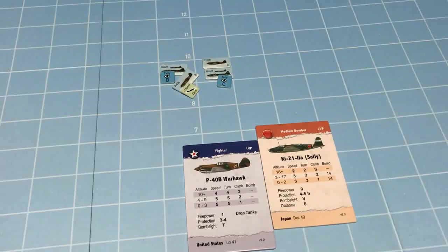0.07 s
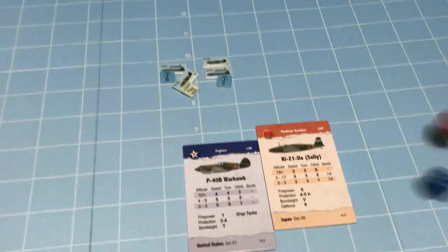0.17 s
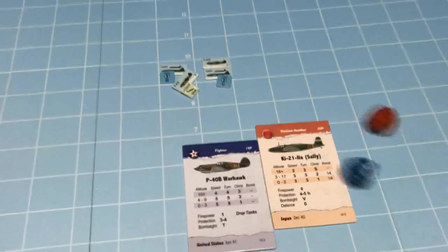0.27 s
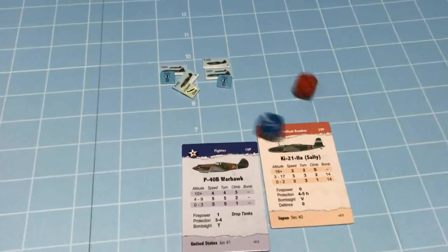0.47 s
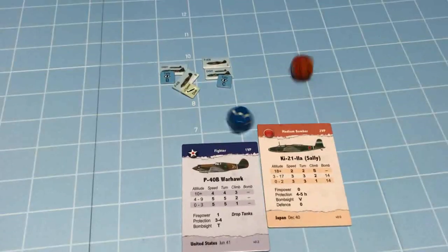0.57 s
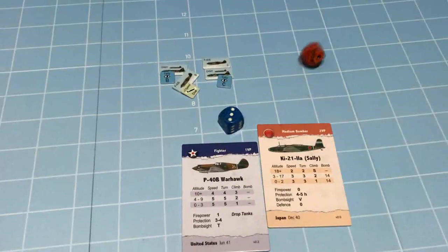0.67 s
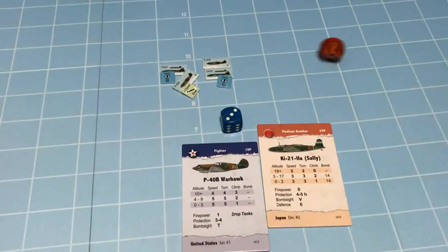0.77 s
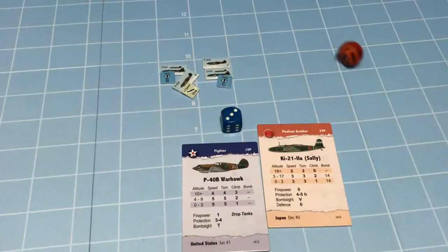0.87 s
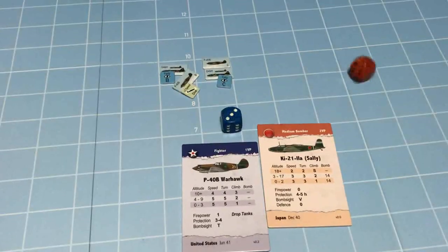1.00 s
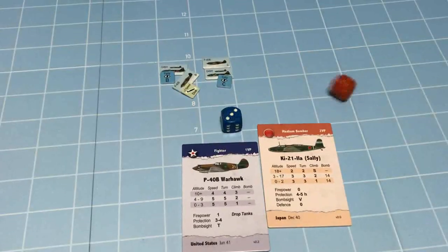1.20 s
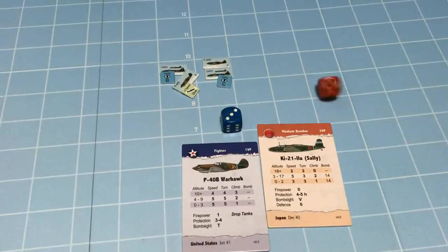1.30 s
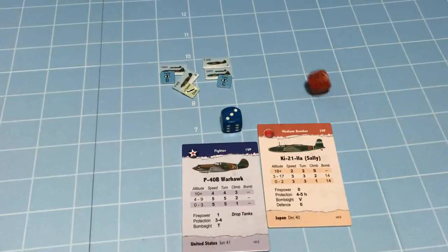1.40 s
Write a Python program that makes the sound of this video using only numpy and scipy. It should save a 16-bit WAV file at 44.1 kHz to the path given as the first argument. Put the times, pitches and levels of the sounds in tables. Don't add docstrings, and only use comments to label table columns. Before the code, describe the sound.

Dice thrown on a padded table: bright hand clicks, a tight burst of loud dull knocks, a softer rolling patter, then sparse faint taps as they settle, closely miked in a small room with low hum.

```python
import sys
import numpy as np
from scipy import signal
from scipy.fft import rfft, irfft
from scipy.io import wavfile
from scipy.ndimage import uniform_filter1d

SR = 44100
rng = np.random.default_rng(int(sys.argv[2]) if len(sys.argv) > 2 else 0)


def linear_from_db(decibels):
    return 10 ** (np.asarray(decibels, float) / 20)


def put_to_file(sound):
    columns = np.atleast_2d(sound).T
    safe = np.clip(columns, -1, 1)
    whole_steps = np.round(safe * 32767)
    wavfile.write(sys.argv[1], SR, whole_steps.astype(np.int16))


N = 63945

EARLIER_CLICK_DB, EARLIER_CLICK_HZ = -23.5, 5500
EARLIER_LOW_DB, EARLIER_HIGH_DB = -10.5, -7.5


def unit(x):
    return x / np.max(np.abs(x))


def add(out, at_s, x):
    i = max(int(round(at_s * SR)), 0)
    out[i:i + len(x)] += x[:len(out) - i]


def lowpass(x, hz):
    return signal.sosfilt(signal.butter(2, hz, fs=SR, output="sos"), x)


def highpass(x, hz):
    return signal.sosfilt(signal.butter(4, hz, "high", fs=SR, output="sos"), x)


def band(x, hz, width):
    limits = [hz / (1 + width), min(hz * (1 + width), SR * .45)]
    y = signal.sosfilt(signal.butter(2, limits, "band", fs=SR, output="sos"), x)
    return y / np.std(y)


def noise_band(count, hz, width):
    return band(rng.standard_normal(count), hz, width)


def decay(t, t60_s):
    return np.exp(-np.log(1000) * t / t60_s)


def modes(partials, count):
    t = np.arange(count) / SR
    return sum(linear_from_db(db) * np.sin(2 * np.pi * hz * t) * decay(t, t60_s) for hz, db, t60_s in partials)


def floor():
    # frequency in Hz, relative density in dB per Hz
    tone_shape = np.array([(15, -26.5), (25, -1), (167, 2.5), (538, -11.5), (952, -19.5), (2210, -32),
                           (2530, -30.5), (14800, -44), (16500, -54.5)])
    f, t = np.fft.rfftfreq(N, 1 / SR), np.arange(N) / SR
    shape = linear_from_db(np.interp(np.log(f + 1), np.log(tone_shape[:, 0]), tone_shape[:, 1]))
    tone = irfft(rfft(rng.standard_normal(N)) * shape * (f > 22), N)
    mains_hz = 120.3
    hum = np.sin(2 * np.pi * mains_hz * t) * np.sqrt(2) + 0.22 * noise_band(N, 127, 0.15)
    hiss = linear_from_db(-85) * noise_band(N, 13000, 0.18)
    drone = linear_from_db(-67.5) * noise_band(N, 264, .05)
    return linear_from_db(-57) * tone / np.std(tone) + hiss + linear_from_db(-57) * hum + drone


def earlier_ring():
    level_db, t60_s = -57.5, 0.46
    t = np.arange(N) / SR
    return linear_from_db(level_db) * decay(t, t60_s) * noise_band(N, 6400, .07)


def room(x):
    # delay in seconds, level in dB, smear in seconds
    reflections = [(.0012, -16, 0.0022), (.0085, -17.5, .0008), (.0101, -19.5, .001), (.0137, -14.5, .0012),
                   (.0177, -22.5, .002), (.0255, -29.5, .003)]
    # centre in Hz, level in dB, t60 in seconds
    tail_bands = [(250, -42.5, 1), (463.8, -34.5, 0.17), (1000, -45, 0.23), (1982, -48, 0.27),
                  (4000, -47.5, 0.28), (7700, -56, .3), (14000, -46.5, 0.14)]
    build_s, bass_below_hz, bass_db = .004, 2970, -4
    t = np.arange(SR // 2) / SR
    response = np.zeros(len(t))
    for hz, db, t60_s in tail_bands:
        response += linear_from_db(db) * noise_band(len(t), hz, 0.51) * np.sqrt(hz / 8000) * decay(t, t60_s)
    response *= 1 - np.exp(-t / build_s)
    for lag_s, db, smear_s in reflections:
        burst = rng.standard_normal(512) * np.exp(-t[:512] / smear_s)
        burst = burst - (1 - linear_from_db(bass_db)) * lowpass(burst, bass_below_hz)
        add(response, lag_s, linear_from_db(db) * burst / np.linalg.norm(burst))
    lead = SR // 100
    past = np.concatenate([np.zeros(lead), x])
    add(past, 0, linear_from_db(EARLIER_CLICK_DB) * click(EARLIER_CLICK_HZ, EARLIER_LOW_DB, EARLIER_HIGH_DB))
    return signal.fftconvolve(past, response)[lead:lead + N]


def click(hz, low_db, high_db):
    cycles = 2.3
    t = np.arange(256) / SR

    def ring(ring_hz):
        turns = t * ring_hz
        return turns ** 2 * np.exp(-4 * turns / cycles) * np.sin(2 * np.pi * turns)

    rings = ring(hz) + linear_from_db(low_db) * ring(hz * 0.583) + linear_from_db(high_db) * ring(hz * 1.237)
    rings = rings + linear_from_db(-17) * ring(hz * 2.1)
    return unit(highpass(rings, hz * 0.44))


def hand_clicks():
    # time in seconds, peak in dB, pitch in Hz, low ring in dB, high ring in dB
    contacts = [(0.0248, -23.5, 6000, -9, -4), (.069, -44.5, 5570, -6.5, -19), (.109, -40, 5880, -4, -31),
                (0.1894, -4.5, 6800, -26, 2), (0.233, -34, 7060, -12.5, -1.5), (.380, -42, 7050, -28, -12),
                (0.391, -62, 7500, -3, 2), (.3992, -29, 8600, -5.5, 2.5), (0.4332, -45, 8670, -16, 4),
                (.2957, -32, 4200, -8, -14)]
    out = np.zeros(N)
    for s, db, hz, low_db, high_db in contacts:
        add(out, s - 1 / hz, linear_from_db(db) * click(hz, low_db, high_db))
    return out


def scuffs():
    # start in seconds, rise in seconds, level in dB, centre in Hz
    slides = [
        (0.515, 0.027, -64.5, 10000),
        (0.602, 0.019, -66.5, 12000),
        (0.628, 0.048, -72.5, 4430),
        (0.22, .04, -69.5, 13500),
        (.29, .03, -72.5, 13300),
        (.385, 0.021, -66, 14000),
        (.58, 0.11, -60, 49.3),
        (1.141, 0.065, -65.5, 54),
    ]
    t, out = np.arange(N) / SR, np.zeros(N)
    for s, rise_s, db, hz in slides:
        u = np.maximum(t - s, 0) / rise_s
        out += linear_from_db(db) * u * np.exp(1 - u) * noise_band(N, hz, 0.49)
    return out


def knock(hz, tick_db, rise_s, die):
    sag, swell = 0.23, 1.54
    over_ratio, over_db = 1.714, -7
    rebound_s, rebound_db = .0023, -33.5
    crack_hz, crack_db, crack_s, tick_rise_s = 3650, -12.5, 0.0022, .00004
    t = np.arange(512) / SR
    u = t / rise_s
    phase = 2 * np.pi * hz * (t + sag * rise_s * 2 * (1 - np.exp(-u / 2)))
    body = u ** swell * np.exp(-u) * np.sin(phase)
    body = body + linear_from_db(over_db) * u * np.exp(-u) * np.sin(over_ratio * phase)
    body = body + linear_from_db(rebound_db) * np.roll(body, int(rebound_s * SR))
    crack = linear_from_db(crack_db) * noise_band(512, crack_hz, .7) * np.exp(-t / crack_s)
    tick = (modes(die, 512) + crack) * (1 - np.exp(-t / tick_rise_s))
    return unit(body) - linear_from_db(tick_db) * tick


def die_contacts():
    # time in seconds, peak in dB, knock in Hz, tick in dB
    bounces = [(.2535, -8.5, 942, -12), (.2934, -4.5, 894, -10.5), (.3347, -11, 806, -12.5),
               (.3880, -17, 915, -15), (.3995, -25, 710, -37), (.4302, -11.5, 875, -17),
               (.5642, -30.5, 1037, -14.5), (.6052, -25, 777, -12.5), (.6394, -27.5, 904, -4),
               (.6427, -27, 833, -16), (.6765, -26.5, 822, -18.5), (.6792, -31, 823, -25),
               (.7057, -29, 813, -10.5), (0.9037, -33, 1000, -10.5), (1.2875, -27.5, 848, -16),
               (1.2908, -33.5, 631, -35)]
    # time in seconds, peak in dB, knock in Hz, tick in dB
    edge_hits = [(0.5628, -33, 874, -27), (0.567, -32.5, 880, -18), (0.617, -38.5, 870, -5),
                 (.659, -32, 874, -19.5), (.6715, -36, 780, -26), (.6895, -41, 910, -27),
                 (.722, -36, 860, -34), (.727, -36, 1100, -18), (0.731, -37, 750, -44),
                 (0.7381, -31.5, 770, -40), (.744, -37, 778, -33), (0.753, -41, 1000, -36),
                 (0.758, -40, 1000, -29), (.765, -41, 750, -14), (.7695, -38, 815, -22.5),
                 (.773, -35.5, 796, -20), (.782, -40, 800, -32), (0.787, -46, 780, -14),
                 (1.3872, -52.5, 900, -33), (1.190, -41.5, 900, -31), (0.989, -43, 1000, -20),
                 (1.409, -53, 850, -31)]
    # frequency in Hz, level in dB, t60 in seconds
    landing_die = [(2420, 10.5, 0.001), (4238, -9.5, 0.0014), (7000, -2, 0.001), (8950, -18.5, 0.0022),
                   (13000, -12.5, 0.0017), (15500, -22, 0.00077)]
    # frequency in Hz, level in dB, t60 in seconds
    rolling_die = [(2330, 3.5, 0.0013), (4080, -3, 0.0031), (8430, -10, 0.0023), (12000, -15.5, 0.0033)]
    rolls_from_s, landing_rise_s, roll_rise_s, rattle_rise_s = .55, 0.00056, 0.00072, 0.00071
    out = np.zeros(N)
    for s, db, hz, tick_db in bounces:
        if s < rolls_from_s:
            hit = knock(hz, tick_db, landing_rise_s, landing_die)
        else:
            hit = knock(hz, tick_db, roll_rise_s, rolling_die)
        add(out, s, linear_from_db(db) * hit)
    for s, db, hz, tick_db in edge_hits:
        add(out, s, linear_from_db(db) * knock(hz, tick_db, rattle_rise_s, rolling_die))
    return out


def table_thuds():
    # frequency in Hz, t60 in seconds
    plate = [(65, 0.093), (150, 0.12), (292, 0.087), (540, 0.053)]
    # time in seconds, then level in dB of each table mode from low to high
    strikes = [(.2535, -31.5, -35.5, -29.5, -21), (0.2924, -63, -30, -20, -32),
               (.3347, -38, -36.5, -30.5, -61), (0.389, -58, -38, -32, -37),
               (0.4305, -40.5, -56, -27.5, -29), (0.563, -41, -44.5, -45.5, -43)]
    # time in seconds, level in dB, frequency in Hz, t60 in seconds
    thumps = [(0.9028, -35, 342, 0.049), (.99, -47, 316, 0.11), (1.11, -50, 295, 0.21),
              (1.2876, -35.5, 330, 0.042), (1.2879, -40, 566, 0.027), (0.544, -48, 149, 0.064)]
    rise_s, count = 0.0014, SR // 4
    out = np.zeros(N)
    swell = 1 - np.exp(-np.arange(count) / SR / rise_s)
    for s, db, hz, t60_s in thumps:
        add(out, s, modes([(hz, db, t60_s)], count) * swell)
    for s, *mode_dbs in strikes:
        struck = [(hz, db, t60_s) for (hz, t60_s), db in zip(plate, mode_dbs)]
        add(out, s, modes(struck, count) * swell)
    return out


def wobbles():
    # centre time in seconds, level in dB, length in seconds, brightness in dB
    turns = [(0.498, -46, 0.047, -27), (.823, -44, 0.017, -25.5), (0.911, -51.5, 0.034, -35.5),
             (.992, -51, 0.037, -27.5), (1.106, -57, 0.049, -36), (1.195, -54.5, 0.045, -23.5),
             (1.413, -61.5, 0.024, -25), (0.706, -53.5, 0.23, -21.5)]
    t, out = np.arange(N) / SR, np.zeros(N)
    swings = np.repeat(rng.standard_normal(N // 64 + 1), 64)
    swings_db = 5.5 * uniform_filter1d(swings, size=64)[:N]
    grit = rng.standard_normal(N) * linear_from_db(swings_db)
    dull = band(grit, 883, 0.42) + linear_from_db(-20) * band(grit, 2040, 0.25)
    bright = band(grit, 3070, 1.0)
    for s, db, length_s, bright_db in turns:
        swell = np.exp(-8 * ((t - s) / length_s) ** 2)
        out += linear_from_db(db) * swell * (dull + linear_from_db(bright_db) * bright)
    return out


def scene():
    dry = hand_clicks() + die_contacts() + wobbles()
    return (dry + table_thuds() + room(dry) + scuffs() + earlier_ring() + floor())[None]


def band_limit(x):
    return signal.sosfilt(signal.butter(12, 16850, fs=SR, output="sos"), x)


def record(dry):
    top_hz, mic_low_hz = 16600, 45
    x = signal.sosfilt(signal.ellip(8, .2, 70, top_hz, fs=SR, output="sos"), dry)
    x = highpass(x, mic_low_hz)
    return band_limit(x)


dry = scene()
out = record(dry)
put_to_file(out)
```